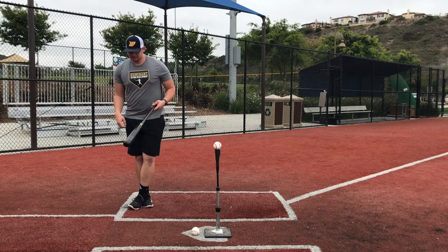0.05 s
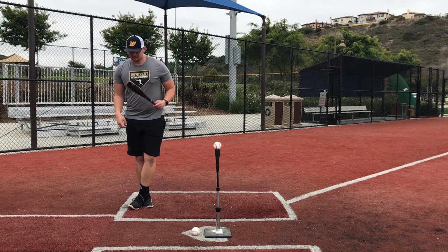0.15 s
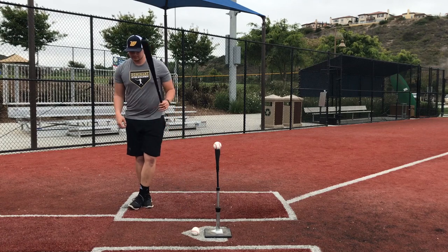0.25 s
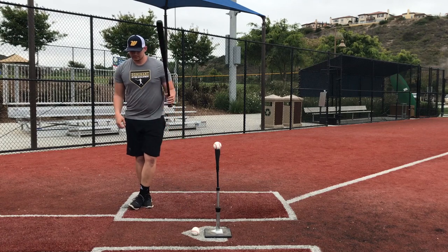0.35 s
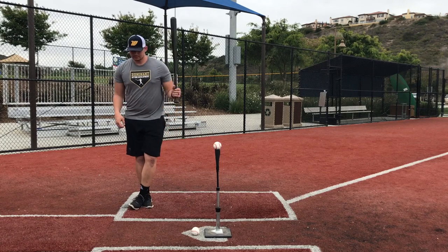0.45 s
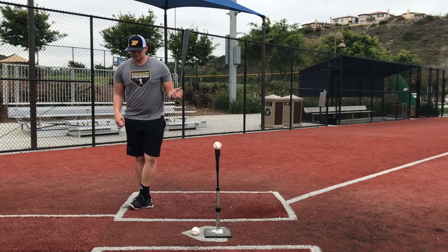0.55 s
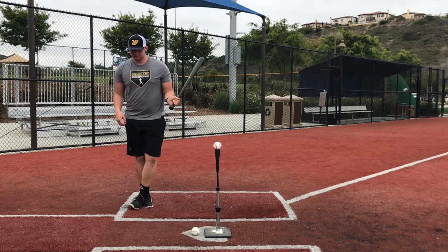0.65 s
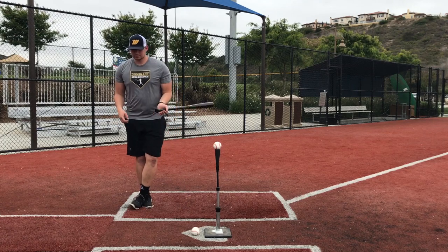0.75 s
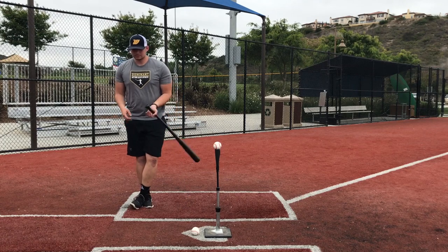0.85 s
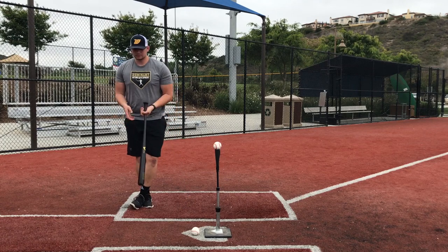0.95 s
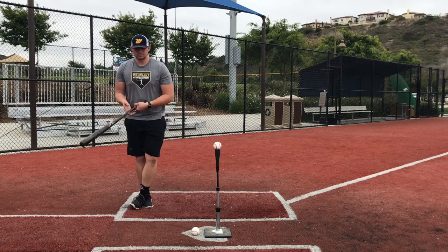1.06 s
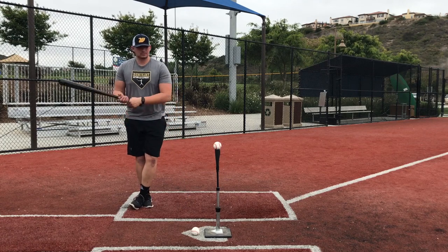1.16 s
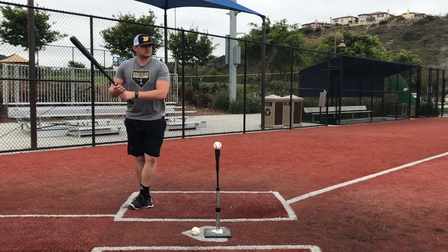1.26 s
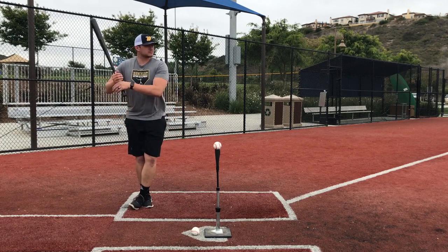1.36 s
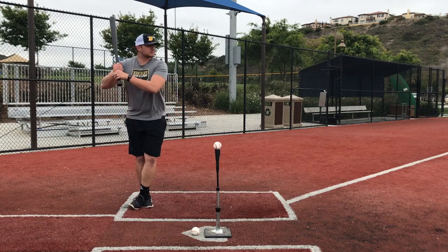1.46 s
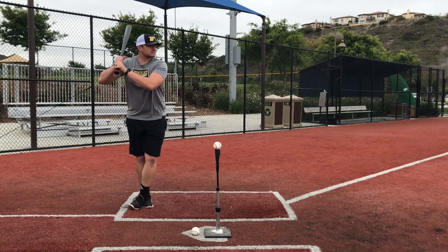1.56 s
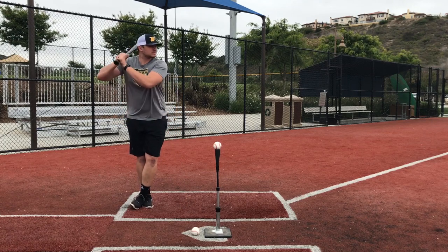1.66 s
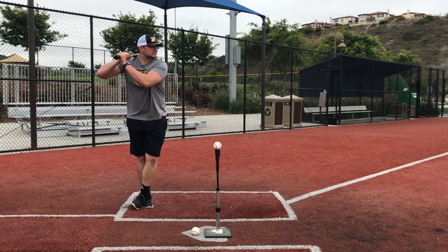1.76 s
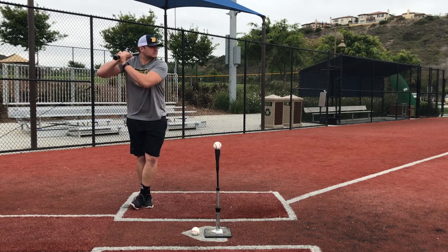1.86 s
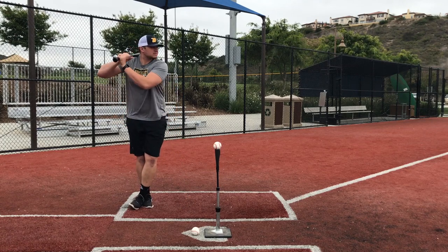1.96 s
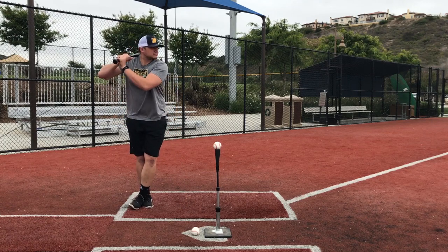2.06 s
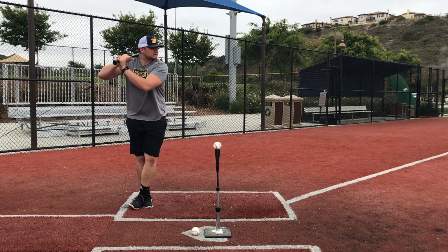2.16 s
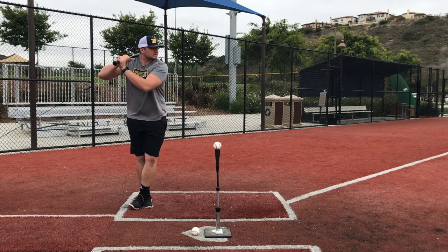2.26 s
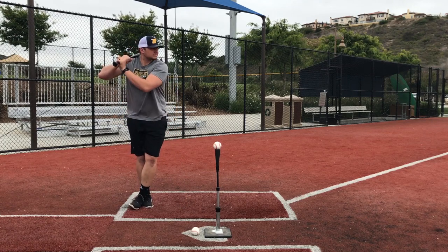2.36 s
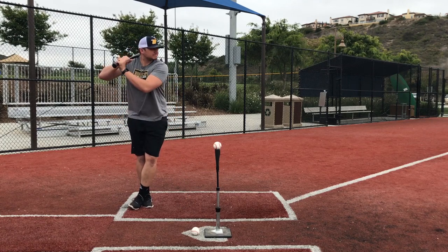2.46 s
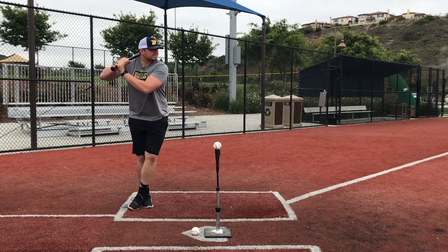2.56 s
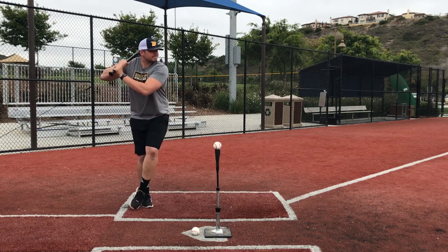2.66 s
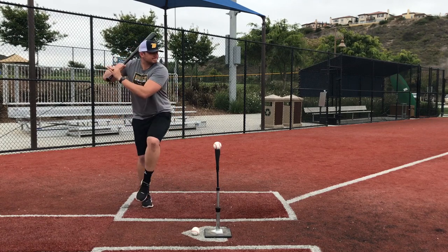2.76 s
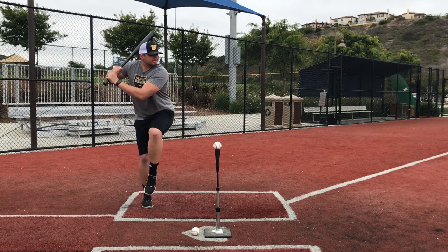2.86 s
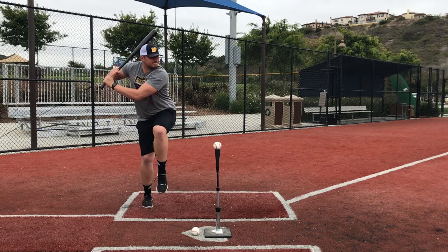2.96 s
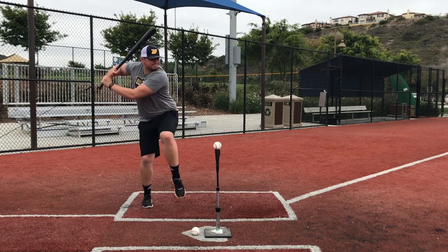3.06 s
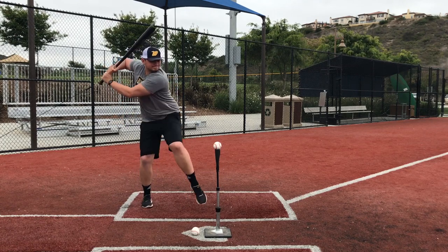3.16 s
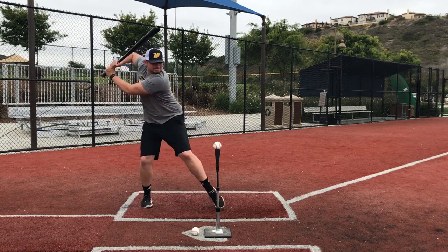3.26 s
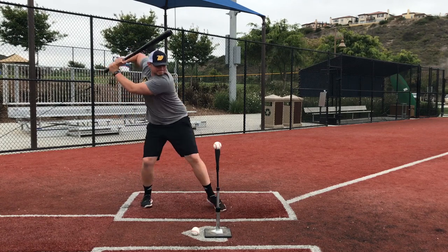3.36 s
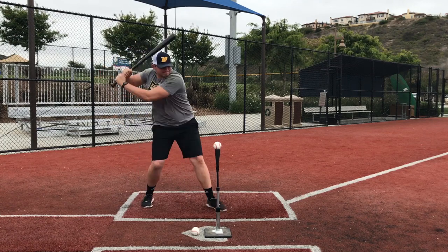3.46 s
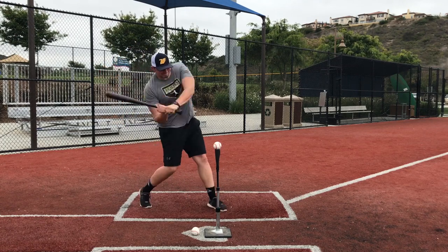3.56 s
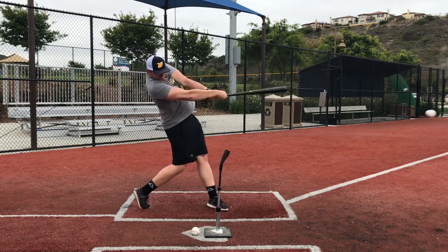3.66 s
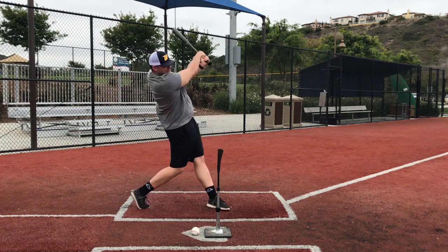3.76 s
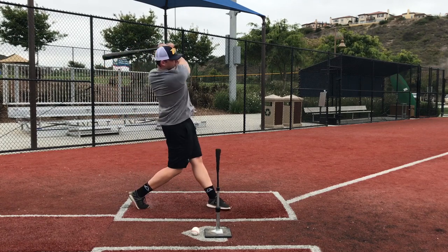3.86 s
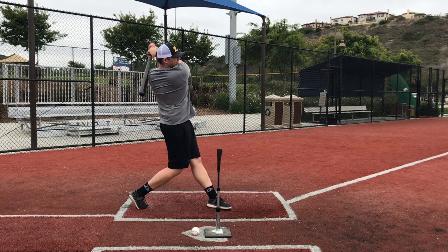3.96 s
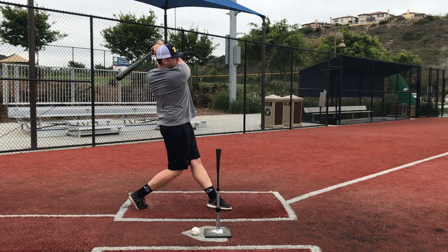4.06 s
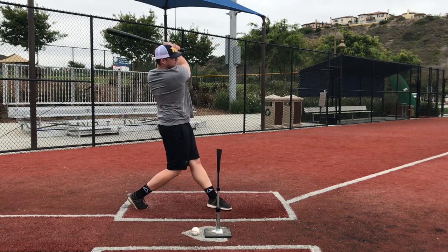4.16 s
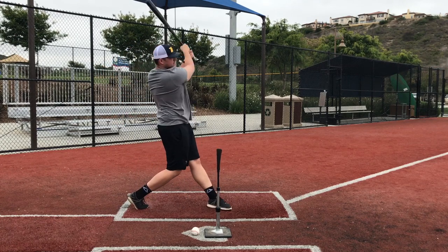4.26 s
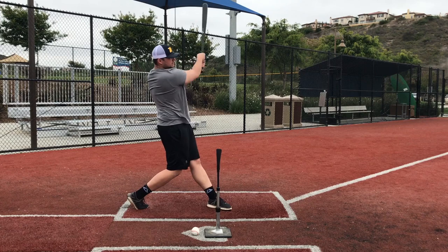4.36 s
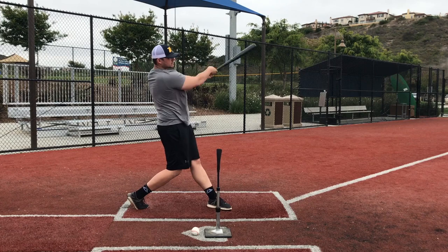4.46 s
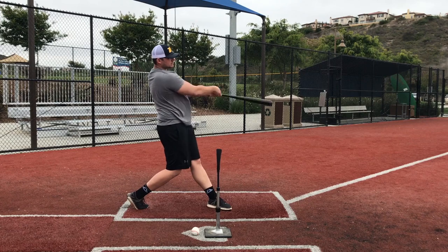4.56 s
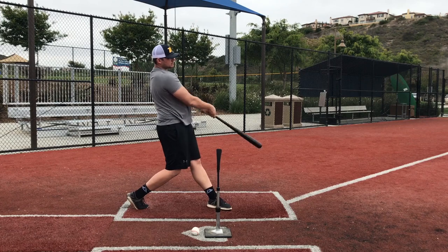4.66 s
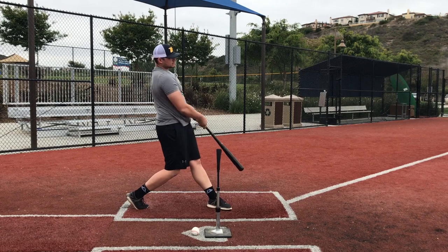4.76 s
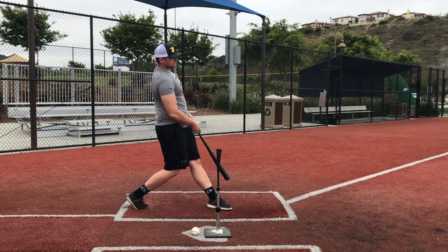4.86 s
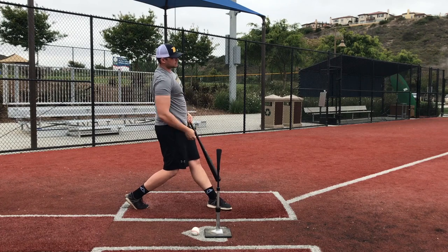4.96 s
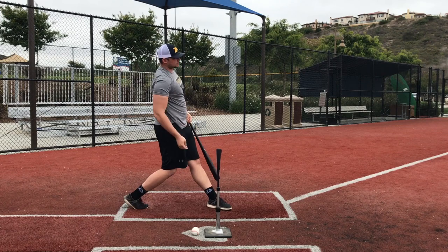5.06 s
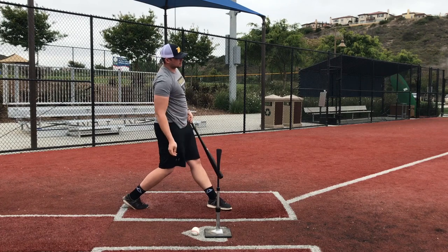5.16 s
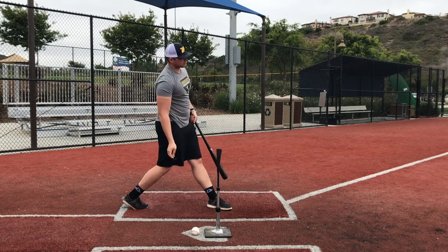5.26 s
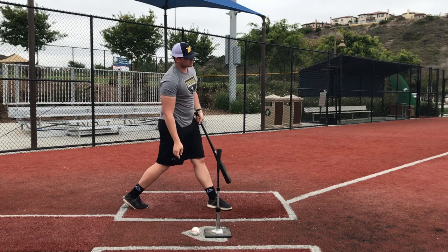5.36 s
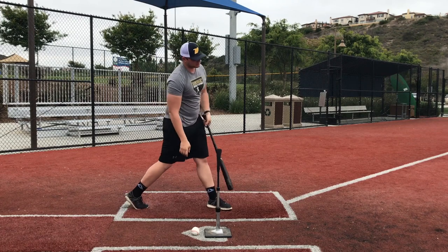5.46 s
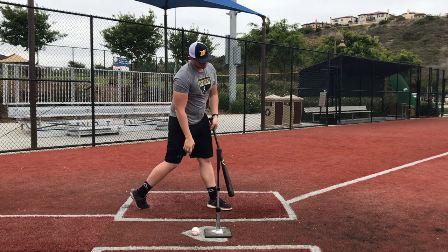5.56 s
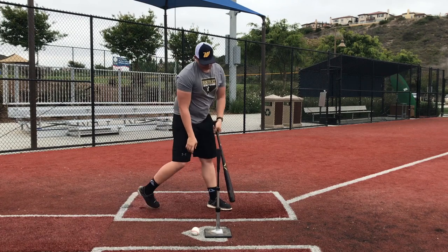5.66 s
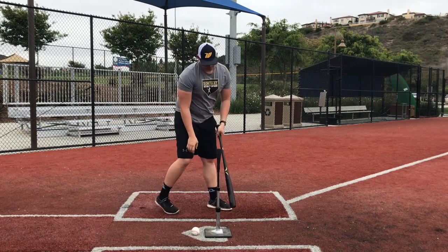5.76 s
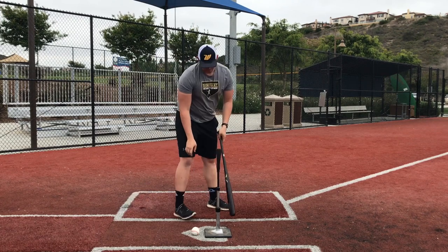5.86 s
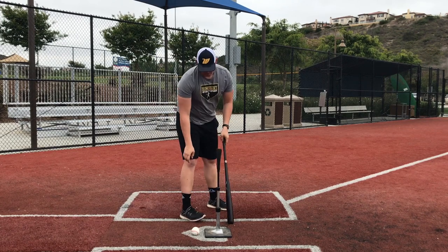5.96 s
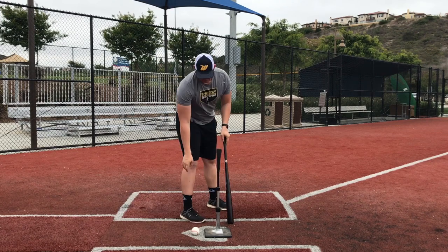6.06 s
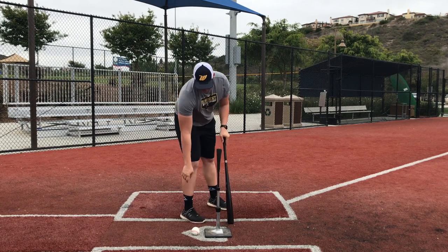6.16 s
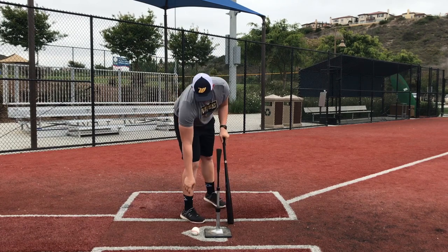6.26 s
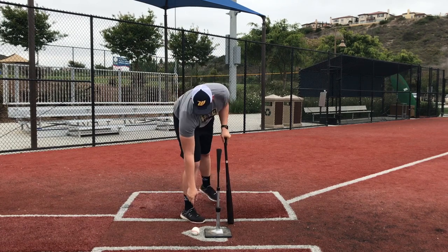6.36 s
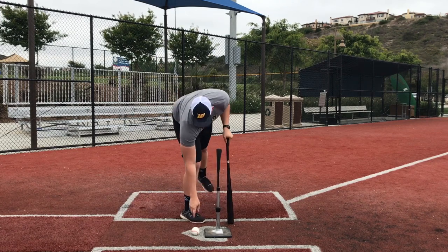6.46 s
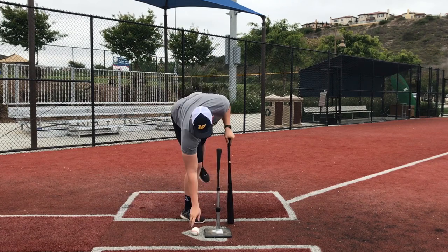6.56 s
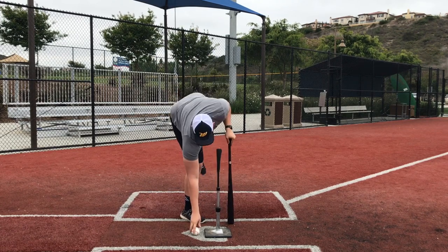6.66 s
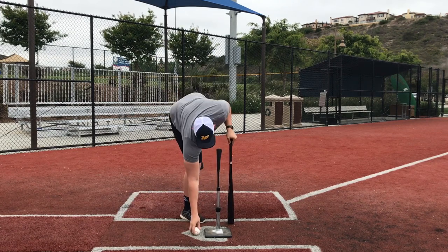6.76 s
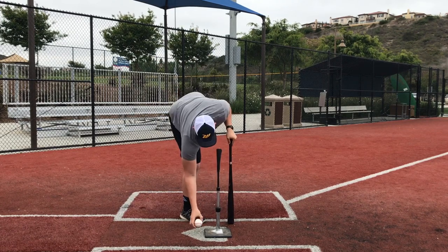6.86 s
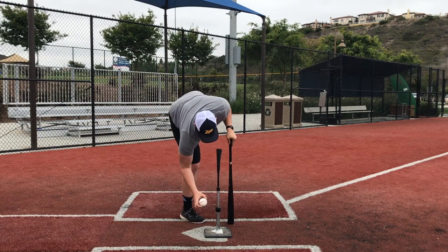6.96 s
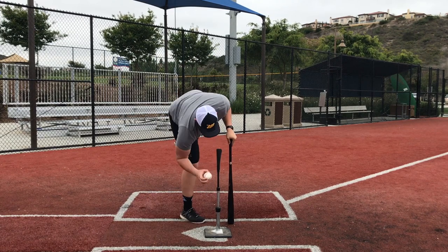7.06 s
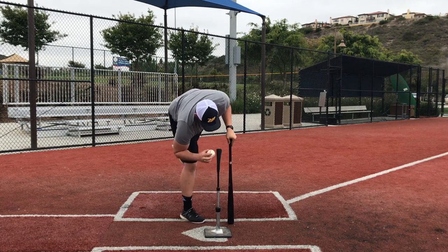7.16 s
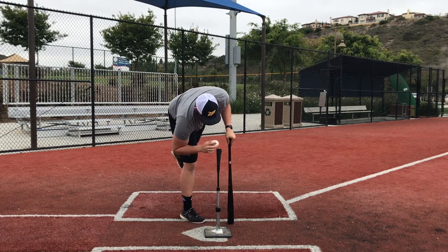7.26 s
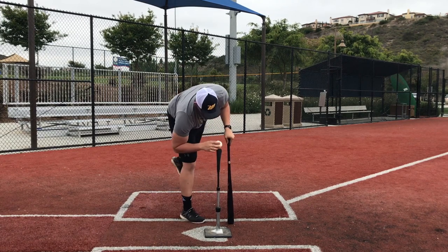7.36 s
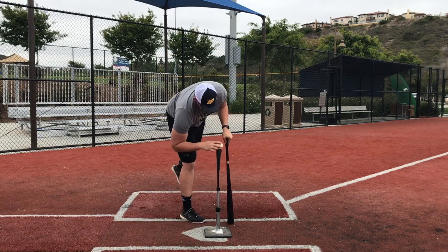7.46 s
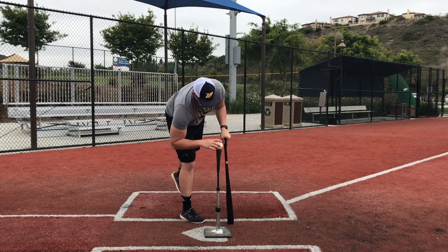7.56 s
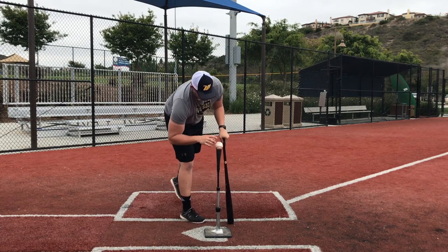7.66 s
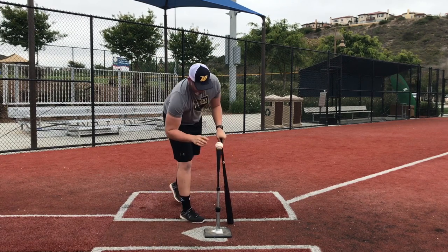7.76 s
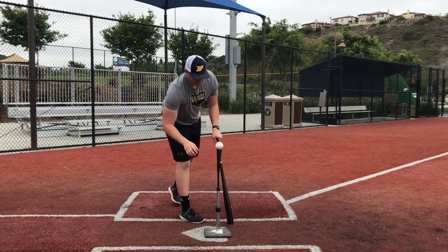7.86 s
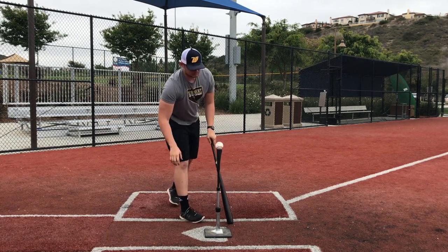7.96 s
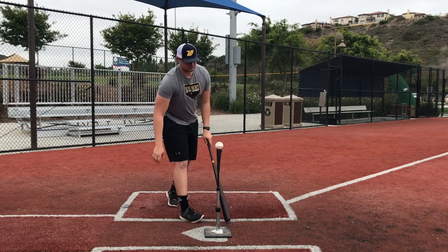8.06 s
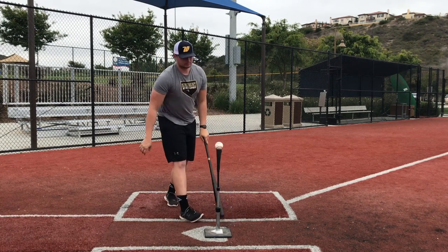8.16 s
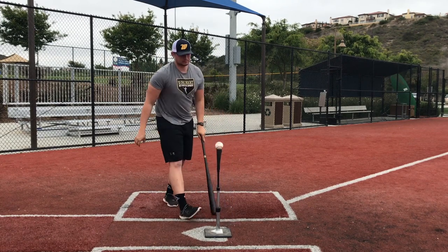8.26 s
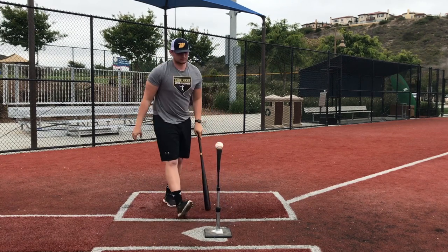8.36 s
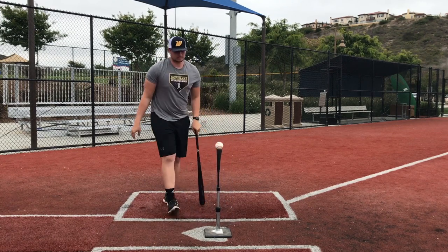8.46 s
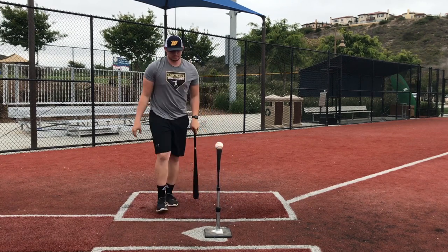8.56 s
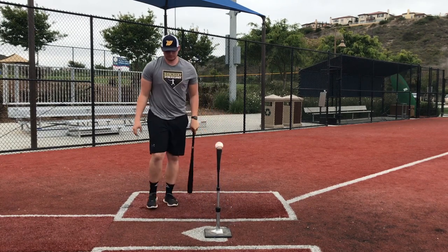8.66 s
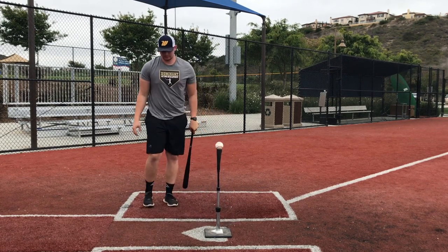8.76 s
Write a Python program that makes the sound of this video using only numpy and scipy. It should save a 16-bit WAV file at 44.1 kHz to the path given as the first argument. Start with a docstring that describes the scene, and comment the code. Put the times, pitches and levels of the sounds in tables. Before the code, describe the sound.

Faint chirps and one nasal bird call sound over a low, far road rumble outdoors. A quick swing ends in a single hard crack of a wooden bat on a ball, a few metres from the microphone and far louder than anything else. It slaps back from the surroundings and leaves a faint ring in a fence. Afterwards come a soft bat knock, light gritty shoe scrapes and low bumps of feet and tee.

```python
"""A wooden bat cracks a ball off a tee on an open practice field, over birdsong and distant traffic.
The crack is a sharp burst and a brief ring of the wood; it sets fence metal ringing and slaps back
from the backstop and, half a second later, from far buildings. The batter's soles scrape and crunch
on the turf, and feet and tee bump dully as he sets up the next ball. Small birds whistle short
glides, one gives a nasal call, and the road rumbles and drones."""
import sys
import numpy as np
from scipy import signal
from scipy.fft import rfft, irfft
from scipy.io import wavfile

SR = 44100
rng = np.random.default_rng(int(sys.argv[2]) if len(sys.argv) > 2 else 0)


def master_out(mix):
    """Clip the mix to full scale and print it as 16-bit PCM to the path in sys.argv[1]."""
    frames = np.transpose(np.atleast_2d(mix))
    ceiling = np.clip(frames, -1, 1)
    pcm = np.round(ceiling * 32767).astype(np.int16)
    wavfile.write(sys.argv[1], SR, pcm)


N = 388080
T = np.arange(N) / SR
HIT_S = 3.7454


def undb(db):
    """Decibels to gain."""
    return 10 ** (np.asarray(db) / 20)


def unit(x):
    """Scale to rms 1."""
    return x / np.std(x)


def colour(points, f):
    """Gain at frequencies f from (frequency [Hz], level [dB]) points."""
    hz, db = np.transpose(points)
    return undb(np.interp(np.log(f + 1), np.log(hz), db))


def band(x, lo_hz, hi_hz, order=2):
    """Causal band-pass."""
    hi_hz = min(hi_hz, .45 * SR)
    lo_hz = min(lo_hz, .99 * hi_hz)
    return signal.sosfilt(signal.butter(order, [lo_hz, hi_hz], "band", fs=SR, output="sos"), x + 1e-18)


def noise(lo_hz, hi_hz):
    """Noise band, rms 1."""
    return unit(band(rng.standard_normal(N), lo_hz, hi_hz))


def walk(rate_hz):
    """Smooth random drift, spread near 1."""
    knots = rng.standard_normal(int(N / SR * rate_hz) + 2)
    return np.interp(T * rate_hz, np.arange(len(knots)), knots)


def swell(peak_s, rise_s, fall_s):
    """Bell envelope with separate rise and fall."""
    width_s = np.where(T < peak_s, rise_s, fall_s)
    return np.exp(-np.minimum(np.abs(T - peak_s) / width_s, 10) ** 2 / 2)


def add(out, at_s, x):
    """Mix x into out at at_s."""
    i = int(at_s * SR)
    out[i:i + len(x)] += x[:max(N - i, 0)]


def ring(modes, t):
    """Damped modes struck at t = 0."""
    return sum(undb(db) * np.sin(2 * np.pi * hz * t) * np.exp(-np.log(1000) * t / t60_s)
               for hz, db, t60_s in modes)


def traffic():
    """Low rumble eases slightly while engine hum and tyre wash slowly grow; vehicles drone past."""
    # road noise spectrum: (frequency [Hz], relative density [dB])
    spectrum = [(13, -52.5), (22, -26), (53, 0.5), (102, -1), (154, -11.5), (172, -12), (267, -22.5),
                (450, -30), (489, -30.5), (1050, -27), (2150, -37.5), (3330, -40.5), (5030, -47),
                (10800, -53.5), (15500, -52)]
    # passing vehicles: (peak time [s], rise [s], fall [s], firing rate [Hz], level [dB])
    vehicles = [(1.7, 0.78, 1.1, 147.5, -59), (4.45, 0.34, 0.35, 91.6, -54), (5.02, 0.29, 0.42, 115, -55),
                (7.6, 0.52, 0.64, 204.8, -66.5), (8.0, 0.13, 0.2, 97.9, -52.5)]
    f = np.fft.rfftfreq(N, 1 / SR)
    road = unit(irfft(rfft(rng.standard_normal(N)) * colour(spectrum, f), N))
    low, low_mid = (irfft(rfft(road) / (1 + (f / edge_hz) ** 6), N) for edge_hz in (155, 330))
    drones, rumble_db = np.zeros(N), -1 - .1063 * T
    for peak_s, rise_s, fall_s, firing_hz, db in vehicles:
        near = swell(peak_s, rise_s, fall_s)
        gain = near * undb(db + 2 * walk(5.7))
        hz = firing_hz * (1 + .008 * walk(22))
        drones += gain * np.sin(2 * np.pi * np.cumsum(hz) / SR)
        rumble_db += 1.5 * near
    rumble = low * undb(rumble_db + .8 * walk(1.9))
    engines = (low_mid - low) * undb(-.03 + .5051 * T)
    wash = (road - low_mid) * undb(-.61 + .312 * T + .8 * walk(4))
    return undb(-54.5) * (rumble + engines + wash) + drones


def high_hiss(centre_hz=10650, half_width_hz=170):
    """Faint, steady, narrow hiss."""
    f = np.fft.rfftfreq(N, 1 / SR)
    peak = 1 / (1 + ((f - centre_hz) / half_width_hz) ** 2)
    return undb(-94) * unit(irfft(rfft(rng.standard_normal(N)) * peak, N))


def brief_hiss(length_s=.42):
    """A faint, flat hiss follows the hit and cuts off."""
    age_s = np.maximum(T - HIT_S, 0)
    gate = (1 - np.exp(-age_s / .013)) * np.clip((length_s - age_s) / .014, 0, 1)
    return undb(-70) * gate * noise(1500, 16000)


def whistle(length_s, top_hz, sweep_hz, contour, flutter):
    """One bird note: a glide along a contour, fluttering in pitch and level."""
    rate_hz, pitch_share, depth_db = flutter
    u = np.linspace(0, 1, int(length_s * SR))
    beat = 2 * np.pi * rate_hz * rng.uniform(.9, 1.1) * length_s * u
    curve = np.polyfit(np.linspace(0, 1, len(contour)), contour, len(contour) - 1)
    hz = (top_hz - sweep_hz * np.polyval(curve, u)) * (1 + pitch_share * np.cos(beat))
    envelope = np.sqrt(np.abs(np.sin(np.pi * u))) * undb(depth_db * np.sin(beat))
    return envelope * np.sin(2 * np.pi * np.cumsum(hz) / SR)


def nasal_call(jitter=.0093, dulling_db_per_s=31):
    """A bird yelps, breaks downward and sinks; its throat favours the harmonic sliding through it."""
    # course of the call: (time [s], pitch [Hz], relative level [dB])
    course = [(1.11, 2000, -76), (1.124, 2410, -63), (1.134, 2346, -58), (1.143, 1595, -59.5),
              (1.16, 1500, -62), (1.202, 1214, -70), (1.244, 1138, -68.5), (1.324, 1072, -69.5),
              (1.388, 941.3, -72), (1.41, 835, -74)]
    # throat resonance: (frequency [Hz], gain [dB])
    throat = [(1000, -20), (1600, -14), (2300, -5), (3200, 2.5), (4700, -2), (5100, -13), (6200, -14),
              (7200, -27)]
    # harmonics, lowest first: (relative level [dB])
    harmonics = [-1.5, -5, -3.5, -8.5, -4.5, -16]
    times_s, pitch_hz, db = np.transpose(course)
    hz = np.interp(T, times_s, pitch_hz) * (1 + jitter * walk(400))
    phase = 2 * np.pi * np.cumsum(hz) / SR
    dull_db = dulling_db_per_s * np.maximum(T - times_s[0], 0)  # upper harmonics fade as force drops
    call = np.zeros(N)
    for k, harmonic_db in enumerate(harmonics, 1):
        gain = undb(harmonic_db - (k > 3) * dull_db + 2.7 * walk(60.9))
        call += gain * colour(throat, k * hz) * np.sin(k * phase)
    return undb(2.5) * call * np.interp(T, times_s, undb(db), left=0, right=0)


def birds(trees_db=-9, trees_decay_s=.056):
    """Whistled notes and one nasal call, softened by the trees around them."""
    # notes, six kinds: (time [s], length [s], top [Hz], sweep [Hz], level [dB])
    slurs = [(1.848, 0.038, 4100, 1090, -75.5), (2.255, 0.026, 3940, 1000, -68.5),
             (2.849, 0.027, 4200, 1160, -69.5), (2.936, 0.064, 4140, 1200, -71),
             (3.259, 0.05, 3240, 1070, -63.5), (3.401, 0.06, 2960, 726, -64.5),
             (7.243, .035, 5680, 600, -73), (7.498, .014, 4150, 800, -74), (7.704, .018, 4310, 1400, -70),
             (7.808, 0.024, 3650, 400, -78), (8.3, .033, 4350, 650, -73.5)]  # fall
    hooks = [(2.425, 0.085, 5230, 940, -80), (2.716, 0.076, 5210, 1100, -72), (2.72, .024, 5900, 750, -80),
             (2.92, 0.018, 5300, 1100, -82), (3.127, .023, 4310, 400, -79), (3.149, 0.028, 4050, 1500, -68),
             (3.522, 0.016, 3420, 750, -69), (3.576, .056, 3220, 950, -65), (6.325, .035, 6100, 940, -73),
             (7.291, .012, 4250, 1050, -72.5), (7.299, 0.0206, 4250, 1000, -75),
             (7.488, 0.018, 4250, 1400, -71), (7.696, .021, 4180, 1400, -70)]  # drop, level off
    arches = [(1.63, 0.042, 3900, 750, -80), (7.226, 0.046, 4250, 1200, -77),
              (7.419, 0.053, 4250, 1250, -72), (7.625, 0.056, 4260, 1360, -72),
              (8.328, .022, 4000, 400, -80), (8.348, 0.028, 3440, 300, -78)]  # rise, fall
    rises = [(1.27, 0.16, 4170, 328, -76), (2.24, .016, 3970, 800, -76), (2.355, 0.028, 5000, 500, -84),
             (2.835, .014, 3950, 1000, -77), (3.233, 0.012, 3420, 700, -73), (7.08, .014, 6520, 1106, -78),
             (2.872, 0.024, 3870, 350, -70), (3.086, 0.024, 3322, 380, -69),
             (3.535, 0.053, 3240, 545, -59.5), (5.14, .05, 4710, 480, -79), (5.37, 0.053, 4730, 750, -77)]  # climb, hold
    flats = [(2.04, 0.057, 4020, 130, -76), (2.725, 0.05, 3520, 56, -79), (4.434, .11, 3540, 100, -78.5),
             (5.23, 0.056, 4830, 60, -83), (5.45, 0.05, 4810, 63, -81.5), (6.745, .09, 4835, 10, -79),
             (6.825, .27, 4780, 20, -80.5), (7.08, .08, 4820, 20, -86), (7.095, 0.044, 3720, 100, -76),
             (7.165, .04, 3750, 60, -80), (7.208, .036, 5380, 30, -79.5), (7.315, 0.065, 3210, 180, -77)]  # nearly level
    trills = [(.37, 0.083, 3650, 327, -82), (.49, 0.12, 3450, 330, -78), (2.585, .09, 4280, 432, -76.5),
              (5.295, 0.039, 6760, 330, -82)]  # pulse, sink
    # contours: share of the sweep below the top, at even time steps
    slur, hook, arch = (0, .38, 1), (0, .7, .95), (.69, .3, .038, .37, .74)
    rise, sink = (.91, .26, 0), (0, .56, .97)
    # flutter: (rate [Hz], pitch depth [share], level depth [dB])
    pure, trilled = (160, .005, 1.2), (100, .035, 7.2)
    song = np.zeros(N)
    for notes, contour, flutter in ((slurs, slur, pure), (hooks, hook, pure), (arches, arch, pure),
                                    (rises, rise, pure), (flats, sink, pure), (trills, sink, trilled)):
        for at_s, length_s, top_hz, sweep_hz, db in notes:
            add(song, at_s, undb(db) * whistle(length_s, top_hz, sweep_hz, contour, flutter))
    song = song * undb(1.8 * walk(70)) + nasal_call()
    t = T[:SR // 2]
    trees = rng.standard_normal(len(t)) * np.exp(-t / trees_decay_s)
    return song + undb(trees_db) * signal.fftconvolve(song, trees / np.linalg.norm(trees))[:N]


def crunch(ticks_per_s=2500, spread_db=4.5):
    """Crumbs of turf snap free under a sole: dense ticks of uneven size."""
    # crumb spectrum: (frequency [Hz], relative level [dB])
    spectrum = [(1500, -16), (4000, -4), (6300, 0), (7800, -4), (9300, 0), (10400, -3), (12000, 2),
                (16000, -4)]
    snaps = rng.random(N) < ticks_per_s / SR
    size = undb(spread_db * rng.standard_normal(N))
    ticks = snaps * size * rng.choice([-1, 1], N)
    return unit(irfft(rfft(ticks) * colour(spectrum, np.fft.rfftfreq(N, 1 / SR)), N))


def scuffs(edge_ratio=1.9):
    """Soles drag, crunch and squeak on gritty turf; clothing snaps once."""
    # sole squeak bands: (centre [Hz], width [Hz], relative level [dB])
    squeak_bands = [(6850, 400, -2), (11450, 450, 0), (12600, 900, -3), (14200, 3000, -4)]
    # sole drags, and one sharp snap of clothing at 3.677 s: (peak time [s], rise and fall [s], level [dB],
    # centre [Hz], crunch [dB], squeak [dB])
    drags = [(3.621, 0.11, -83, 6000, -1, -8), (3.677, 0.002, -63, 2400, -8, -14),
             (4.74, .054, -77.5, 2700, -7, -10), (5.764, 0.015, -78.5, 6000, -0.5, -14),
             (5.947, 0.024, -73.5, 3300, -1, -25), (6.016, 0.024, -68.5, 3300, 0, -19.5),
             (6.05, .012, -69.5, 2000, -10, -25), (6.088, 0.0035, -76, 5000, 3, 8),
             (8.455, .016, -77.5, 4500, 0, 8), (8.51, .028, -78.5, 5000, 3, -2),
             (8.637, .0079, -67.5, 1700, -24, -30), (8.67, .025, -71.5, 1600, -25, -30)]
    squeak = unit(sum(noise(hz - width_hz / 2, hz + width_hz / 2) * undb(db + 3 * walk(200))
                      for hz, width_hz, db in squeak_bands))
    catch = undb(1.4 * walk(300))
    crumbs, out = crunch(), np.zeros(N)
    for peak_s, width_s, db, hz, crunch_db, squeak_db in drags:
        scrape = catch * noise(hz / edge_ratio, hz * edge_ratio)
        friction = scrape + undb(crunch_db) * crumbs + undb(squeak_db) * squeak
        out += undb(db) * swell(peak_s, width_s, width_s) * friction
    return out


def thumps(rise_s=.0088):
    """Feet and tee land with dull, low bumps."""
    # landings: (time [s], pitch [Hz], level [dB])
    landings = [(5.106, 150, -50), (6.42, 64.7, -44), (6.662, 67, -40.5), (7.247, 81, -42),
                (7.276, 67.6, -32.5), (7.314, 75, -41), (7.923, 84.2, -40), (8.422, 69.8, -43.5)]
    out, t = np.zeros(N), T[:SR // 4]
    envelope = t / rise_s * np.exp(1 - t / rise_s)
    for at_s, hz, db in landings:
        add(out, at_s, undb(db) * envelope * np.sin(2 * np.pi * hz * t))
    return out


def bat_knock(at_s=4.651, rise_s=.0066):
    """The lowered bat knocks softly; close mode pairs blur its pitch."""
    # knock modes: (frequency [Hz], level [dB], t60 [s])
    modes = [(308, -46.5, .075), (332, -48, 0.098), (458, -56, 0.11), (823, -59, .11), (862, -58, 0.16)]
    out, t = np.zeros(N), T[:SR // 4]
    add(out, at_s, ring(modes, t) * (1 - np.exp(-t / rise_s)))
    return out


def bat_tap(at_s=.958):
    """The twirled bat ticks against the hand."""
    # tap modes: (frequency [Hz], level [dB], t60 [s])
    modes = [(1480, -57.5, 0.035), (2100, -63, 0.072)]
    out, t = np.zeros(N), T[:SR // 10]
    tick = band(rng.standard_normal(len(t)), 4900, 11000) * np.exp(-t / .0013)
    add(out, at_s, ring(modes, t) + undb(-53.5) * tick)
    return out


def swing(push_s=3.741, push_hz=80):
    """The barrel whooshes in and pushes a slow pressure wave ahead of it."""
    rush = band(noise(440, 900), 420, 1300) + undb(-7) * noise(170, 280)
    rush += undb(-12.5) * noise(1100, 12000)
    whoosh = rush * swell(HIT_S, .023, .018)
    push = np.cos(2 * np.pi * push_hz * (T - push_s)) * swell(push_s, .0095, .008)
    return undb(-44.5) * whoosh + undb(-27) * push


def fence():
    """The crack reaches wire and posts, which ring on in narrow clusters of close modes."""
    # mode clusters: (delay [s], centre [Hz], width [Hz], level [dB], t60 [s])
    clusters = [(0.078, 3270, 280, -62, .7), (0.2, 2750, 350, -58, .25), (.132, 9100, 900, -67, .25),
                (.21, 8550, 300, -66, .12)]
    out = np.zeros(N)
    for delay_s, hz, width_hz, db, t60_s in clusters:
        age_s = np.maximum(T - HIT_S - delay_s, 0)
        envelope = undb(db - 60 * age_s / t60_s) * (1 - np.exp(-age_s / .006))
        out += envelope * noise(hz - width_hz / 2, hz + width_hz / 2)
    return out


def field_tail(returns_per_s=260, returns_t60_s=.75, bunching_db=3.5):
    """Posts and branches return tiny cracks that merge and die away."""
    # diffuse return of fences and trees: (centre [Hz], width [octaves], start level [dB], t60 [s])
    bands = [(300, 0.91, -64.5, .4), (700, 1.2, -53.5, 0.76), (1500, 0.71, -51.5, 0.8),
             (2902, 0.74, -51.5, .75), (6000, 0.98, -56.5, .55), (12000, 0.98, -60.5, .45)]
    age_s = np.maximum(T - HIT_S, 0)
    diffuse = np.zeros(N)
    for hz, octaves, db, t60_s in bands:
        edge_ratio = 2 ** (octaves / 2)
        envelope = undb(db - 60 * age_s / t60_s + 4.2 * walk(70))
        diffuse += envelope * noise(hz / edge_ratio, hz * edge_ratio)
    posts = rng.uniform(-1, 1, N) * (rng.random(N) < returns_per_s / SR)
    returns = unit(band(signal.oaconvolve(posts, crack())[:N], 1200, 4800, order=3))
    returns *= undb(-51.5 - 60 * age_s / returns_t60_s + bunching_db * walk(45))
    onset = 1 - np.exp(-age_s / .013)
    return (diffuse * undb(2 * walk(310)) + returns) * onset


def echoes(outgoing, roughness=.8):
    """Ground, backstop, dugout, trees and far buildings return the hit smeared, with little bass."""
    # reflections: (delay [s], gain [dB], low edge [Hz], smear [s])
    reflections = [(.0023, -4, 1709, .0006), (.0046, -4.5, 2563, .0005), (.0053, -5, 2394, .00087),
                   (0.0207, -15, 1298, .002), (0.0239, -14.5, 6500, .002), (0.0278, -1, 930, .0006),
                   (.0339, -0.5, 1300, .0008), (.0352, -9, 150, .0015), (0.0396, -13.5, 1156, .004),
                   (.04, -17, 6000, .002), (.0641, -16, 3200, .0006), (0.0647, -13.5, 650, 0.0017),
                   (.0715, -26.5, 5000, .001), (.0931, -24.5, 2480, .0016), (.11, -29, 520, 0.0027),
                   (0.134, -25, 6500, .002), (.1415, -30, 5460, .001), (0.164, -36, 2400, .0015),
                   (0.2082, -28, 1500, .002), (.219, -38, 1200, .002), (.247, -43, 2000, .002),
                   (.5235, -27, 1300, .0013), (.562, -35, 1330, .0018)]
    out, t = np.zeros(N), T[:len(outgoing)]
    for delay_s, db, lo_hz, smear_s in reflections:
        face = rng.standard_normal(len(t)) * np.exp(-t / smear_s)
        face *= roughness / np.linalg.norm(face)
        face[0] += np.sqrt(1 - roughness ** 2) * np.exp(-smear_s / .006)  # mirror-like part
        # air takes more treble from a longer path
        top_hz = 17000 / (1 + 4 * delay_s)
        rolloff_hz = lo_hz * 2.65 / (1 + .35 * delay_s)
        echo = band(signal.fftconvolve(outgoing, face), lo_hz, top_hz, order=3)
        add(out, HIT_S + delay_s, undb(db) * band(echo, lo_hz / 10, rolloff_hz, order=1))
    return out


def crack(lag_at_1khz_s=.0009):
    """One sharp blow; bending waves carry the treble out of the wood ahead of the bass."""
    # contact spectrum: (frequency [Hz], level [dB])
    spectrum = [(60, -13), (290, -9), (390, -22), (600, 8.5), (980, 8), (1200, 18), (1750, 13), (2300, 7),
                (2700, 4.5), (3300, 10.5), (4400, 1), (6500, 2), (8000, -3.5), (10300, -3), (12500, 3),
                (16000, -3)]
    f = np.fft.rfftfreq(SR // 10, 1 / SR)
    dispersion = np.exp(-4j * np.pi * lag_at_1khz_s * np.sqrt(1000 * f))
    burst = irfft(colour(spectrum, f) * dispersion)
    return burst * np.cos(np.linspace(0, np.pi / 2, len(burst))) ** 2


def hit(contact_s=.0009):
    """Bat meets ball: crack, woody ring once the ball has left, rasp on the rubber tee, and echoes."""
    # bat and ball modes: (frequency [Hz], level [dB], t60 [s])
    modes = [(220, -29, 0.058), (636, -3.5, 0.024), (730, -7.5, 0.023), (800, -14, .022), (1124, -12, .023),
             (1290, -17, 0.016), (1472, -17, .02), (1780, -16.5, 0.018), (2220, -22.5, 0.0096),
             (2620, -24.5, 0.018), (3280, -9.5, .014), (4530, -28, 0.021), (6500, -27, .016)]
    t = T[:SR // 10]
    free_s = np.maximum(t - contact_s, 0)
    wood = -ring(modes, free_s) * (1 - np.exp(-free_s / .0031))
    graze = np.exp(-t / .004) * (1 - np.exp(-t / .0016))
    rasp = graze * band(rng.standard_normal(len(t)), 900, 5500, order=1)
    out = echoes(crack() + undb(-11) * wood + undb(-30.5) * rasp)
    add(out, HIT_S, crack() + wood + undb(-19) * rasp)
    return out


def scene():
    """Mono mix, a few metres in front of the tee."""
    strike = hit() + field_tail() + brief_hiss() + fence() + swing()
    batter = bat_tap() + bat_knock() + scuffs() + thumps()
    return (strike + batter + birds() + traffic() + high_hiss())[None]


def record(dry, top_hz=15900):
    """Steep low-pass."""
    return signal.sosfilt(signal.ellip(8, .2, 70, top_hz, fs=SR, output="sos"), dry)


dry = scene()
out = record(dry)
master_out(out)
```